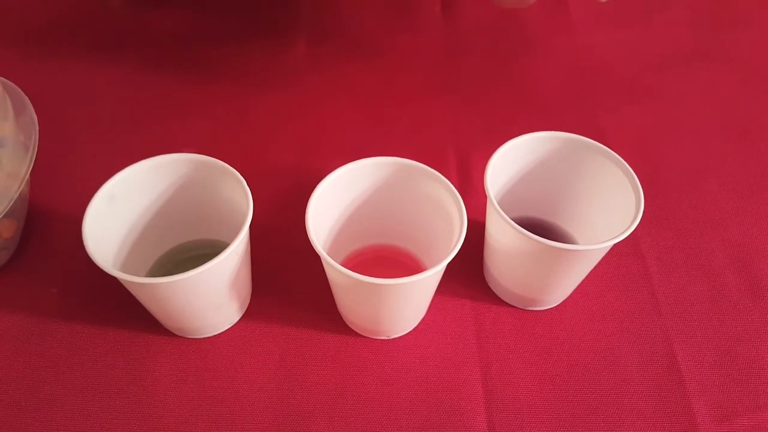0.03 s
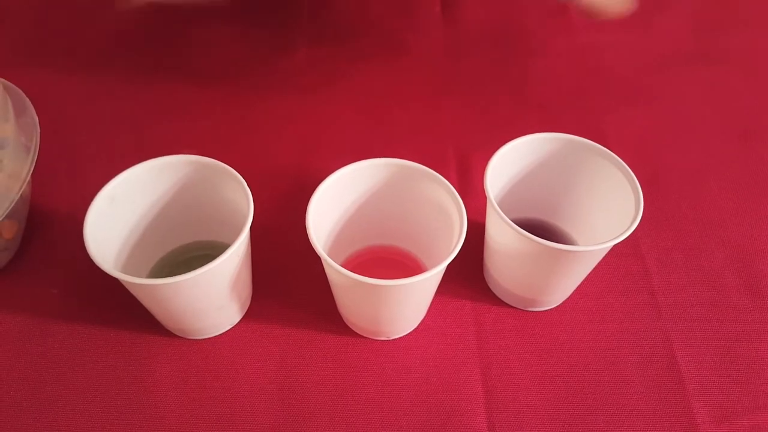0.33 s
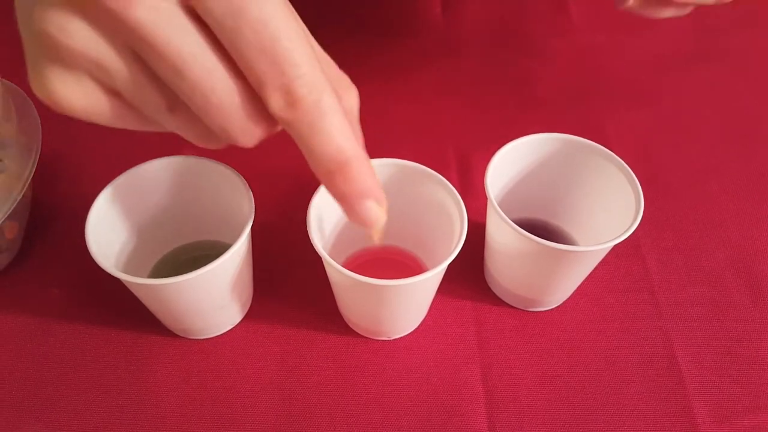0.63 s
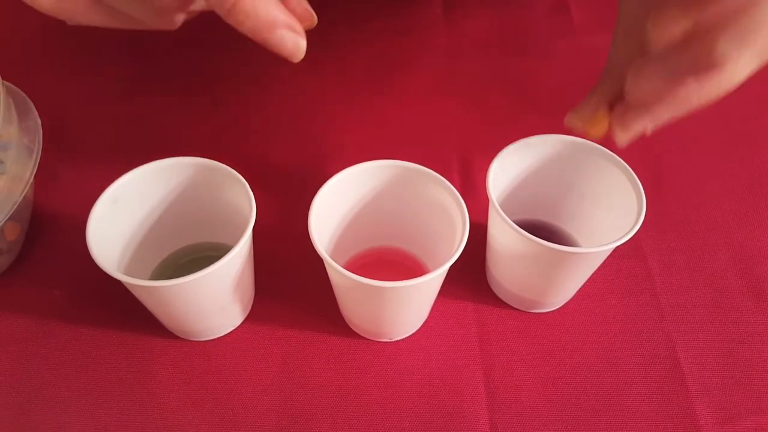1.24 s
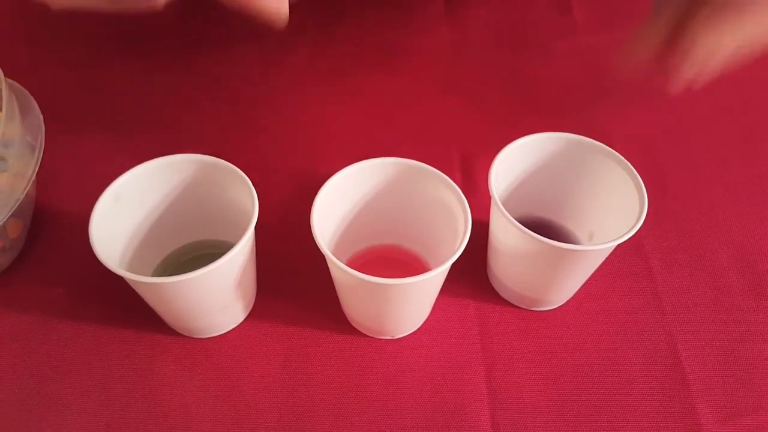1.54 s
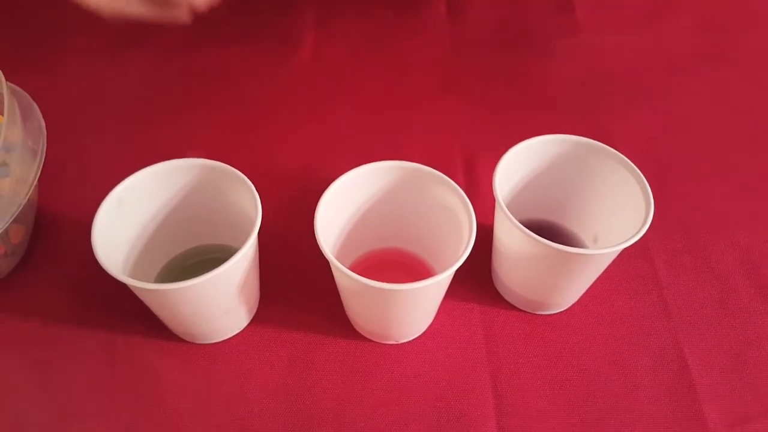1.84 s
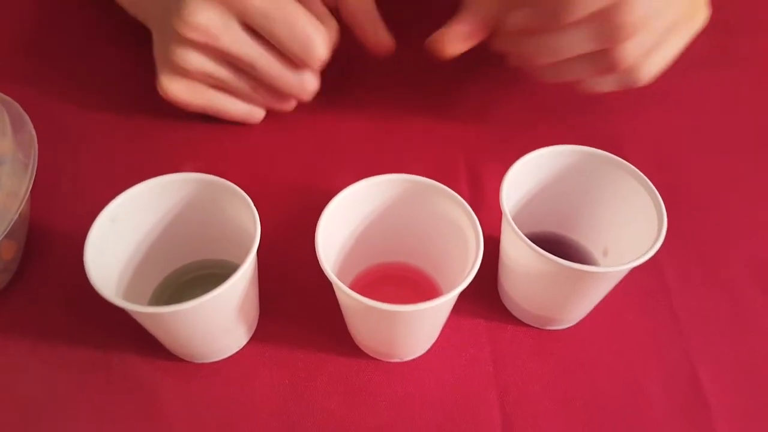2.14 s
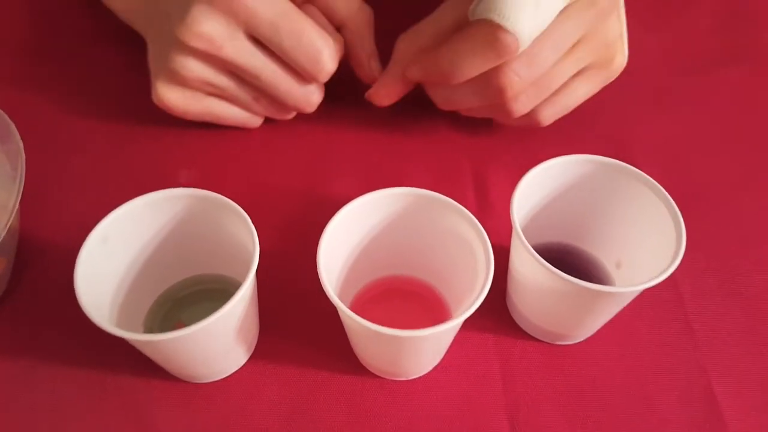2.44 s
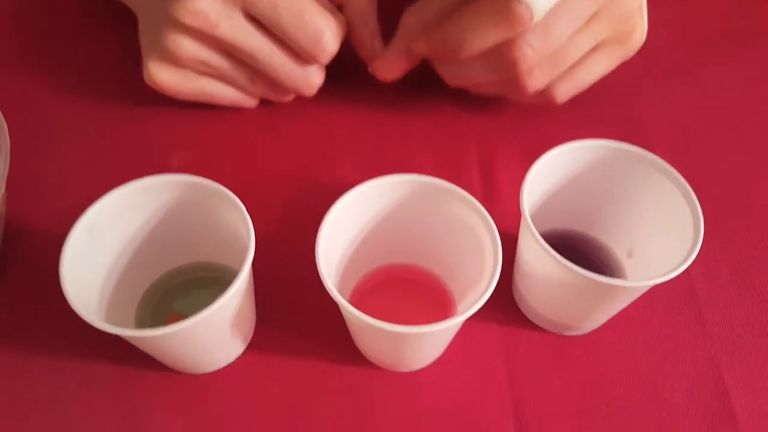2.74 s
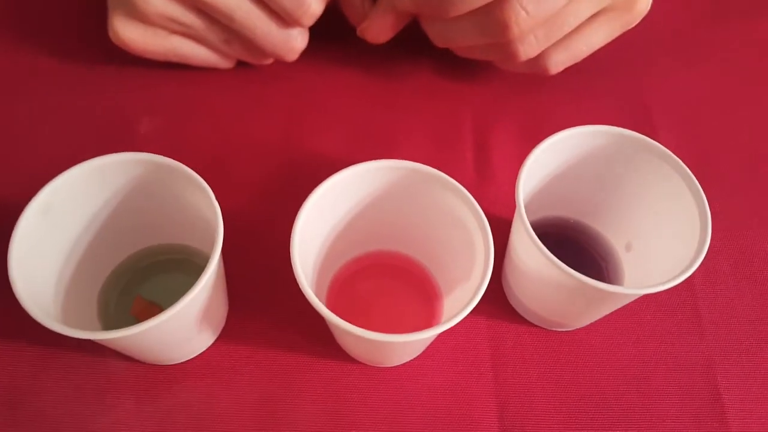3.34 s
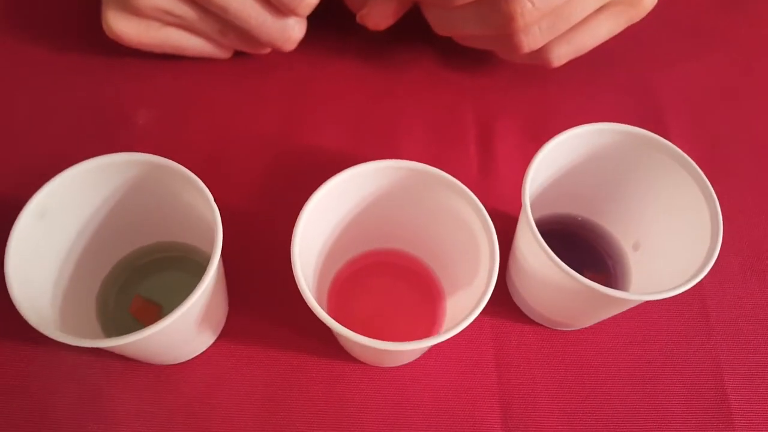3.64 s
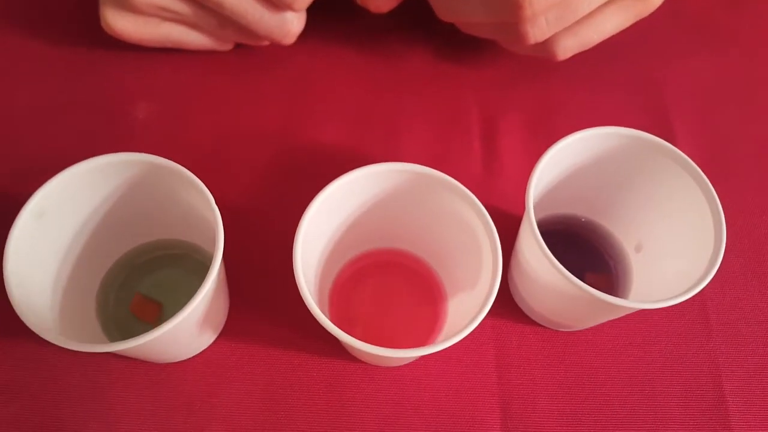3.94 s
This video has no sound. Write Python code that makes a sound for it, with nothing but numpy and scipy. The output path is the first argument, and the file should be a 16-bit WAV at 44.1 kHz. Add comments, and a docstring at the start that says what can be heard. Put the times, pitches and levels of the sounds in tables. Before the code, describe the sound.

A small hard sweet drops into a paper cup with a sharp, close click at about 0.7 seconds and a faint bounce just after. A second sweet clicks into a cup further right at about 1.4 seconds. Throughout the four seconds, air bubbles softly and rapidly through water, like an aquarium aerator, with stray drips, faint finger ticks and a low motor hum in a small room.

```python
"""A small room, a stereo pair close to a cloth-covered table. Two small sweets drop into paper cups that
hold a little liquid, one near the middle, one further right; each contact cracks and rings the cup.
Off to one side air bubbles through water, like an aquarium aerator: about 14 blips a second, some
rising chirps, stray drips. Fingers tick and rub faintly. A motor hums under soft room tone."""
import sys
import numpy as np
from scipy import signal
from scipy.fft import rfft, irfft
from scipy.io import wavfile
from scipy.ndimage import uniform_filter1d

SR = 44100
rng = np.random.default_rng(int(sys.argv[2]) if len(sys.argv) > 2 else 0)


def inscribe(sig):
    """Save sig as 16-bit PCM at rate SR to the path in sys.argv[1].

    A 1-D sig is mono; a 2-D sig holds one channel per row.
    Samples are clipped to [-1, 1] before scaling.
    """
    pcm = np.round(np.clip(np.atleast_2d(sig).T, -1, 1) * 32767)
    wavfile.write(sys.argv[1], SR, pcm.astype(np.int16))


N = 176400
MIDDLE_PAN_DB, RIGHT_PAN_DB = -6.5, -13.5


def amp(db):
    """Decibels to gain."""
    return 10 ** (np.asarray(db) / 20)


def unit_rms(x):
    """Scales to rms 1."""
    return x / np.sqrt(np.mean(x ** 2) + 1e-20)


def curve_at(points, hz):
    """Reads a table on a log-frequency axis."""
    f, value = np.transpose(points)
    return np.interp(np.log(hz + 1), np.log(f + 1), value)


def add(mix, start_s, sound):
    """Mixes a sound in at start_s."""
    part = mix[..., max(round(start_s * SR), 0):][..., :sound.shape[-1]]
    part += sound[..., :part.shape[-1]]


def seconds(size):
    """Time axis for size samples."""
    return np.arange(size) / SR


def pan(db):
    """Left and right gains, db apart; negative leans right."""
    return amp(np.array([[db], [-db]]) / 2)


def off_to_left(x, lag_s):
    """A mono sound reaches the right microphone lag_s after the left."""
    hz = np.fft.rfftfreq(len(x), 1 / SR)
    return irfft(rfft(x) * np.exp(1j * np.pi * hz * lag_s * np.array([[1], [-1]])), len(x))


def burst(colour, decay_s):
    """A dying puff of stereo noise; colour gives dB for each frequency."""
    t = seconds(1024)
    gains = amp(colour(np.fft.rfftfreq(len(t), 1 / SR)))
    noise = irfft(rfft(rng.standard_normal((2, len(t)))) * gains)
    return unit_rms(noise) * np.exp(-t / decay_s)


def pop(db, hz, half_width_octaves=0.084, rise_s=0.0003):
    """A tiny burst of noise centred on hz."""
    puff = burst(lambda f: -3 * abs(np.log2((f + 1) / hz)) / half_width_octaves, decay_s=0.0022)
    return amp(db) * puff * (1 - np.exp(-seconds(puff.shape[1]) / rise_s))


def ring(t, hz, db, t60):
    """One dying mode."""
    return amp(db) * np.exp(-np.log(1000) * t / t60) * np.sin(2 * np.pi * hz * t)


def reverb(x, onset_s=0.0054):
    """The walls return sparse reflections of random sign, each band dying at its own speed."""
    # Decay of the room. Each row: frequency in Hz, t60 in seconds.
    decay = [(150, 0.17), (700, 0.25), (2000, 0.59), (4500, 0.4), (8000, 0.34), (15000, 0.21)]
    taps = rng.choice([-1., 1.], (2, SR // 2)) * (rng.random((2, SR // 2)) < .15)
    hz, t, spectra = signal.stft(taps, SR, nperseg=256)
    fade = np.exp(-np.log(1000) * t / curve_at(decay, hz)[:, None])
    tail = signal.istft(spectra * fade, SR, nperseg=256)[1]
    tail *= np.minimum(seconds(tail.shape[1]) / onset_s, 1) ** 2
    return signal.fftconvolve(x[None], tail / np.linalg.norm(tail[0]), axes=1)[:, :N]


def room_tone(level_db=-48.5, patch_db=1.43):
    """Soft steady noise whose colour drifts in patches."""
    # Colour of the noise. Each row: frequency in Hz, relative density in dB.
    colour = [(25, -29), (43, -19), (150, -4), (260, -4), (420, -11.5), (730, -5.5), (900, -17),
              (2000, -24.5), (4000, -31), (10400, -39), (12500, -36.5), (16000, -41.5)]
    # Likeness at the two microphones. Each row: frequency in Hz, correlation from 0 to 1.
    likeness = [(40, 0.26), (130, 1), (290, 0.93), (640, 0.63), (1400, 0)]
    frames, hz = N // 512 + 5, np.fft.rfftfreq(2048, 1 / SR)
    draws = rng.standard_normal((5, frames, len(hz)))
    left, unrelated = draws[0] + 1j * draws[1], draws[2] + 1j * draws[3]
    patches = unit_rms(uniform_filter1d(uniform_filter1d(draws[4], size=7, axis=0), size=20, axis=1))
    shared = curve_at(likeness, hz)
    right = shared * left + np.sqrt(1 - shared ** 2) * unrelated
    spectra = np.array([left, right]) * amp(curve_at(colour, hz) + patch_db * patches)
    noise = signal.istft(spectra.transpose(0, 2, 1), nperseg=2048, noverlap=1536)[1][:, :N]
    return amp(level_db) * unit_rms(noise)


def motor_hum(waver=0.41):
    """A motor's low tones waver in level and phase."""
    # Tones of the motor. Each row: frequency in Hz, level in dB.
    tones = [(75, -62.5), (252, -61.5)]
    out, t, knots = np.zeros(N), seconds(N), np.linspace(0, N / SR, 40)
    for hz, db in tones:
        swell, drift = (np.interp(t, knots, row) for row in waver * rng.standard_normal((2, len(knots))))
        phase = 2 * np.pi * (hz * t + rng.random()) + 2 * drift
        out += amp(db) * unit_rms((swell - 1.5) * np.sin(phase))
    return out


def finger_rubs(half_width_hz=240):
    """Fingers rub a sweet by the middle cup: tiny slips make a thin, grainy rustle."""
    # Each row: start and length in seconds, level in dB, band centre in Hz.
    strokes = [(0.057, .05, -62, 4300), (0.116, 0.089, -63.5, 3170)]
    out = np.zeros((2, N))
    for start, length, db, hz in strokes:
        t = np.arange(0, length, 1 / SR)
        slips = rng.standard_normal(len(t)) ** 3
        band = 1 / (1 + ((np.fft.rfftfreq(len(t), 1 / SR) - hz) / half_width_hz) ** 2)
        rustle = unit_rms(irfft(rfft(slips) * band, len(t)))
        add(out, start, amp(db) * np.sin(np.pi * t / length) ** .5 * rustle)
    return out * pan(MIDDLE_PAN_DB)


def ticks_and_pops():
    """Faint, narrow-band ticks: some from the fingers, others from water drops popping."""
    # Each row: start in seconds, level in dB, band centre in Hz.
    ticks = [(.6848, -45.5, 11500), (1.169, -42, 3760), (1.858, -47, 8550), (1.9082, -37.5, 2430),
             (1.9912, -42.5, 2580), (2.1428, -39, 2700), (2.485, -43.5, 4800), (2.6539, -39, 2070),
             (3.0375, -48, 5600), (3.2814, -45, 13000), (3.845, -43.5, 9800)]
    out = np.zeros((2, N))
    for start, db, hz in ticks:
        add(out, start, pop(db, hz))
    return out


def fizz(count=60, centre_hz=1890, db=-45):
    """Little bubbles pop at random, the higher ones more weakly."""
    out = np.zeros((2, N))
    for when, strength, tone in rng.random((count, 3)):
        hz = centre_hz * 2 ** (2 * tone - 1)
        add(out, when * N / SR, strength * centre_hz / hz * pop(db, hz))
    return out


def drips(gain_db=15, snap_db=-31, rise_s=0.0017, decay_s=0.0021):
    """Stray drips: tiny pings that start with a snap."""
    # Each row: start in seconds, relative level in dB, pitch in Hz.
    drops = [(.011, -43.5, 4040), (0.5857, -30, 2927), (0.6076, -36, 2360), (1.635, -48, 2680),
             (1.706, -28.5, 2553), (2.1414, -43.5, 3200), (2.998, -45, 2970), (3.653, -44.5, 1346),
             (3.88, -53, 1950), (3.963, -51, 1840)]
    out, t = np.zeros((2, N)), seconds(1024)
    envelope = (1 - np.exp(-t / rise_s)) ** 2 * np.exp(-t / decay_s)
    for start, db, hz in drops:
        ping = envelope * np.sin(2 * np.pi * hz * t)
        add(out, start, amp(db + gain_db) * (ping + pop(snap_db, hz)))
    return out


def surface_chirps(length_s=.022, rise_octaves=0.688, roughness=0.38):
    """A bubble nearing the surface glides up unevenly in pitch, fluttering, and stops."""
    # Each row: end in seconds, level in dB, top pitch in Hz.
    chirps = [(0.26, -41, 1517), (0.531, -49.5, 1416), (.623, -48, 1493), (1.629, -49, 1384),
              (2.752, -43.5, 2000), (2.89, -49, 1580), (3.372, -53.5, 1905), (3.512, -46, 1595),
              (3.677, -49.5, 2213), (3.867, -51, 1926)]
    out, knots = np.zeros(N), np.linspace(0, 1, 14)
    progress = np.arange(0, length_s, 1 / SR) / length_s
    for end, db, top_hz in chirps:
        cycles = np.cumsum(top_hz * 2 ** (rise_octaves * (progress - 1))) / SR
        jitter = roughness * rng.standard_normal((2, len(knots)))
        flutter, wobble = (np.interp(progress, knots, row) for row in jitter)
        envelope = amp(db) * (1 + flutter) * np.sin(np.pi * progress) ** .5
        add(out, end - length_s, envelope * np.sin(2 * np.pi * cycles + 2 * wobble))
    return out * pan(0)


def aerator(gain_db=12, rise_s=0.0024, decay_s=0.0039, thump_s=.018, lead_s=0.00054):
    """Each bubble gives a low thump and a gliding blip that rings the tank; a weaker blip follows."""
    # Bubbles leaving the outlet. Each row: time in seconds, relative level in dB, nominal pitch in Hz.
    bubbles = [(0.0229, -32.5, 652), (0.0926, -28, 810), (0.1645, -28.5, 714), (0.2346, -27, 803),
               (0.3041, -28, 610), (0.3793, -30, 607), (0.4441, -25, 630), (0.5056, -29, 720),
               (0.5853, -29.5, 702), (0.6404, -28.5, 720), (0.7012, -26, 707), (0.7614, -20.5, 779),
               (0.8314, -27.5, 667), (0.8932, -28, 713), (0.9657, -27, 763), (1.0348, -29, 654),
               (1.1044, -32, 602), (1.1701, -31, 654), (1.2464, -29.5, 648), (1.3161, -29.5, 570),
               (1.3815, -28.5, 682), (1.4567, -33, 627), (1.5304, -32, 580), (1.6001, -29, 772),
               (1.6778, -34, 767), (1.7432, -28, 640), (1.7989, -28.5, 713), (1.8709, -28.5, 704),
               (1.9304, -26.5, 680), (2.0018, -26.5, 727), (2.0698, -31, 640), (2.1318, -29.5, 626),
               (2.19, -26, 700), (2.2571, -27, 681), (2.3289, -26.5, 654), (2.3928, -25.5, 645),
               (2.4574, -27, 674), (2.5313, -33, 656), (2.5961, -24.5, 614), (2.6585, -27.5, 658),
               (2.7245, -29, 712), (2.7996, -33, 667), (2.8601, -23, 703), (2.9321, -27, 587),
               (2.998, -32.5, 662), (3.0681, -26, 653), (3.143, -32, 665), (3.2132, -25, 688),
               (3.2838, -32.5, 630), (3.3506, -27.5, 682), (3.4267, -29.5, 633), (3.4897, -26, 697),
               (3.558, -22.5, 661), (3.6329, -32, 656), (3.7029, -22.5, 676), (3.7605, -23, 674),
               (3.8334, -28, 676), (3.9067, -31, 630), (3.967, -21.5, 682)]
    # Thump as a bubble breaks free. Each row: frequency in Hz, relative level in dB.
    thump_tones = [(150, -30), (255, -27)]
    # Modes of the water tank. Each row: frequency in Hz, gain at resonance in dB, t60 in seconds.
    tank_modes = [(682, -3.5, 0.19), (746.5, 4.5, 0.23), (825.3, 1.5, 0.23)]
    settle_hz, settle_s = 785, 0.035
    follow_s, follow_db, follow_ratio = 0.014, -11.5, 1.175
    blips, thumps, t = np.zeros(N), np.zeros(N), seconds(8192)
    tank = sum(ring(t, hz, db, t60) * 2 * np.log(1000) / (t60 * SR) for hz, db, t60 in tank_modes)
    thump = sum((-1) ** k * amp(db) * np.sin(2 * np.pi * hz * t) for k, (hz, db) in enumerate(thump_tones))
    thump *= np.sin(np.pi * np.minimum(t / thump_s, 1)) ** .5
    envelope = (1 - np.exp(-t / rise_s)) ** 2 * np.exp(-t / decay_s)
    settling = settle_s * (1 - np.exp(-t / settle_s))
    for when, db, hz in bubbles:
        # The pitch starts a little flat of nominal and drifts towards the tank's own note.
        phase = 2 * np.pi * (settle_hz * t + (0.97 * hz - settle_hz) * settling)
        gain = amp(db + gain_db)
        add(thumps, when - lead_s, gain * thump)
        add(blips, when - lead_s, gain * envelope * np.sin(phase))
        delay = follow_s * (1 + rng.standard_normal() / 10)
        add(blips, when + delay, gain * amp(follow_db) * envelope * np.sin(follow_ratio * phase))
    return off_to_left(blips + thumps + signal.oaconvolve(blips, tank)[:N], lag_s=0.00032)


def cup(modes, hits, pan_db, rise_s=0.00029, pan_corner_hz=2200):
    """Each contact of a sweet cracks and rings the cup; the treble favours the nearer microphone."""
    # Crack of the hard sweet on the cup wall. Each row: frequency in Hz, relative density in dB.
    crack_colour = [(200, -6), (1000, -3), (4500, 4), (8000, 0), (10500, -11.5), (13500, -7), (16000, -14)]
    out, t, body = np.zeros((2, N)), seconds(8192), 0
    attack = 1 - np.exp(-t / rise_s)
    for k, (hz, db, t60) in enumerate(modes):
        sides = pan(pan_db * hz ** 2 / (hz ** 2 + pan_corner_hz ** 2))
        body += (-1) ** k * ring(t, hz, db, t60) * attack * sides
    for start, ring_db, crack_db in hits:
        crack = burst(lambda f: curve_at(crack_colour, f), decay_s=0.0017)
        add(out, start, amp(ring_db) * body)
        add(out, start, amp(crack_db) * pan(pan_db / 2) * crack)
    return out


def sweets():
    """One sweet rattles into the middle cup, then another drops into the right one."""
    # Modes of each cup. Each row: frequency in Hz, relative level in dB, t60 in seconds.
    middle_modes = [(1010, -12.5, 0.044), (1697, -12, 0.051), (2670, -14.5, 0.041), (3140, -10, 0.031),
                    (3985, -1.5, 0.021), (5000, -14, 0.034), (5680, -7, 0.017), (6080, -17, 0.019),
                    (8020, -7, 0.0056)]
    right_modes = [(340, -19, 0.045), (1076, -5, 0.028), (1650, -13, 0.033), (2610, -6, 0.013),
                   (3580, -8.5, 0.011), (4300, -3.5, 0.0099), (4900, -2, 0.01), (6270, -10, 0.0086),
                   (7150, -14.5, 0.009)]
    # Contacts with each cup. Each row: start in seconds, ring level in dB, crack level in dB.
    middle_hits = [(0.7398, -32, -19.5), (0.742, -15.5, -16), (0.745, -26, -17), (0.7668, -53, -28.5),
                   (0.9341, -35.5, -33.5)]
    right_hits = [(1.4373, -10.5, -22), (1.4393, -20.5, -18)]
    return cup(middle_modes, middle_hits, MIDDLE_PAN_DB) + cup(right_modes, right_hits, RIGHT_PAN_DB)


def scene():
    """The two drops over the bubbling water, heard direct and off the walls."""
    # Each pair: source, reverb send in dB.
    sources = [(sweets(), -9), (aerator(), -9.5), (surface_chirps(), -10),
               (drips() + ticks_and_pops() + fizz() + finger_rubs(), -14.5)]
    direct = sum(sound for sound, db in sources)
    send = sum(amp(db) * sound.mean(0) for sound, db in sources)
    return direct + reverb(send) + pan(-0.5) * (room_tone() + motor_hum())


def record(dry):
    """The recorder passes nothing much above 16.2 kHz."""
    lowpass = signal.firwin(511, 16200, window=("kaiser", 9), fs=SR)
    return signal.oaconvolve(dry, lowpass[None], "same")


dry = scene()
out = record(dry)
inscribe(out)
```